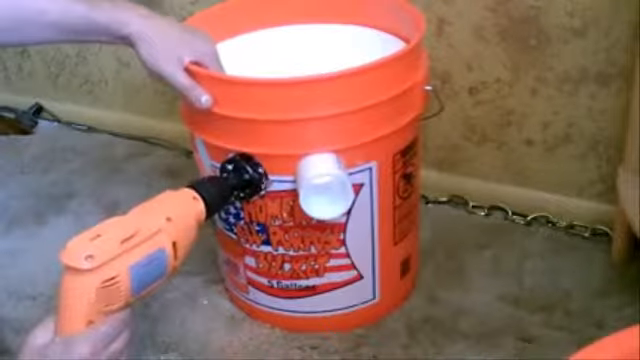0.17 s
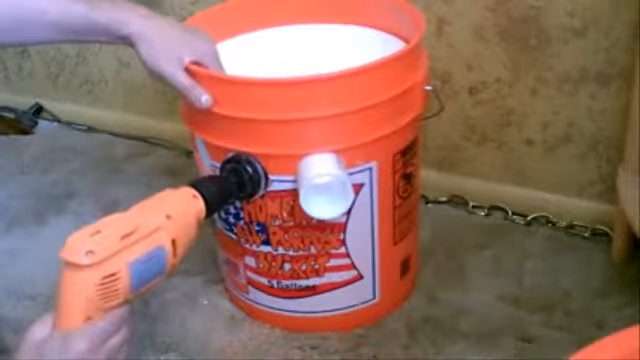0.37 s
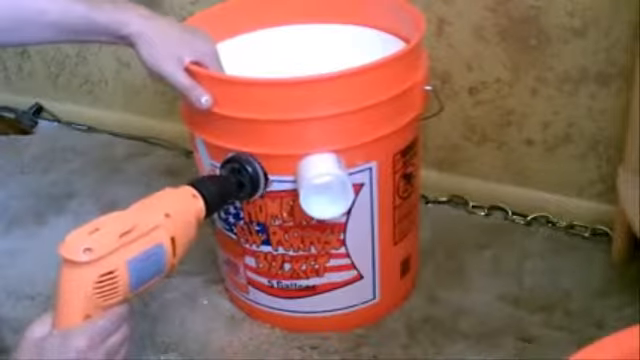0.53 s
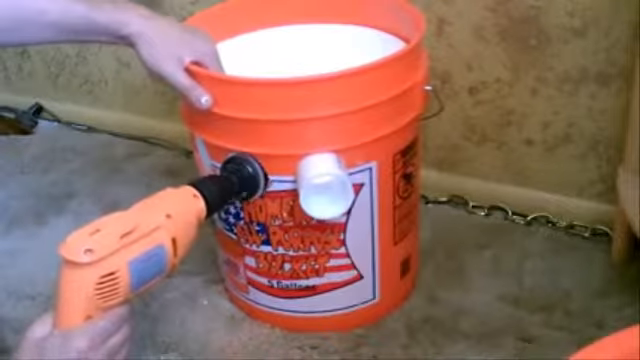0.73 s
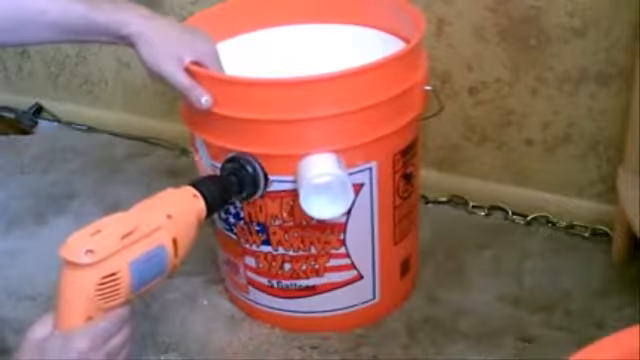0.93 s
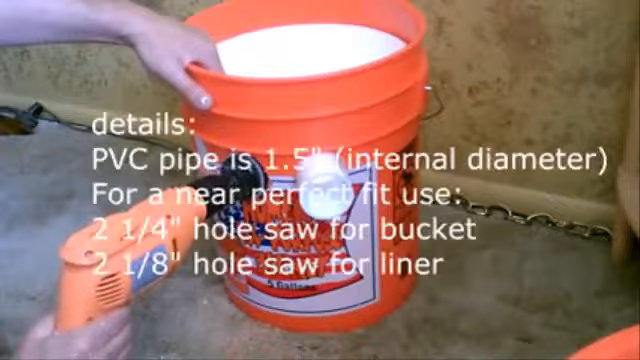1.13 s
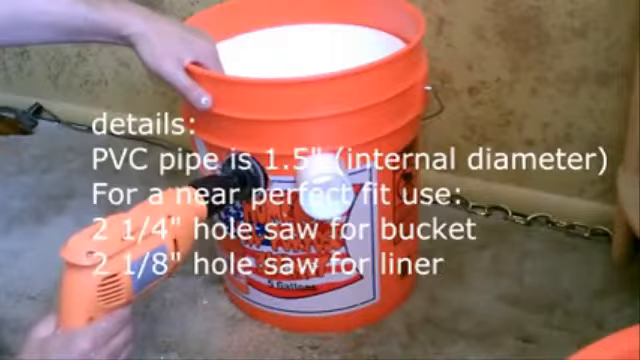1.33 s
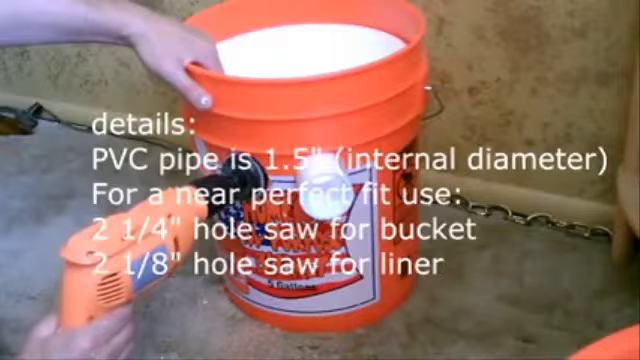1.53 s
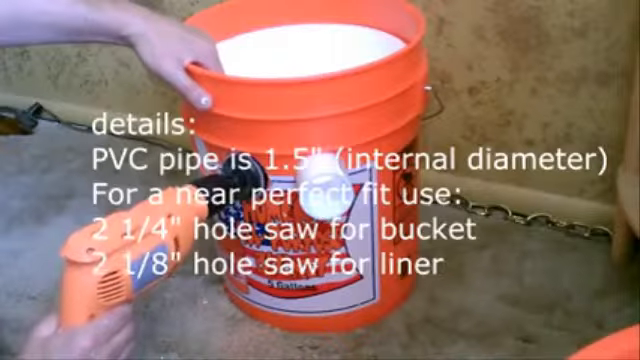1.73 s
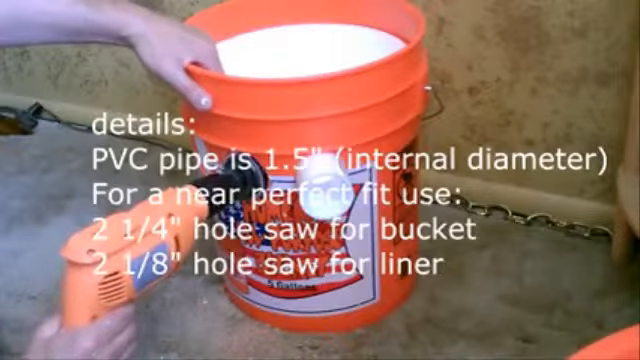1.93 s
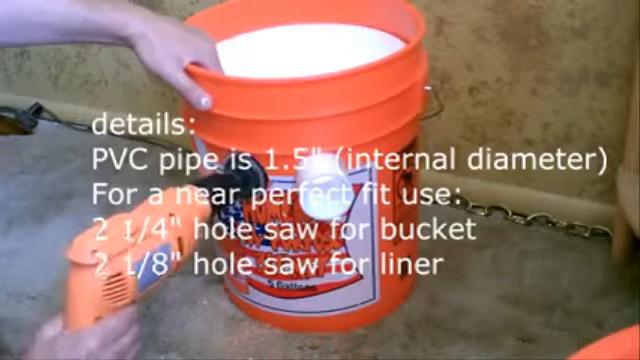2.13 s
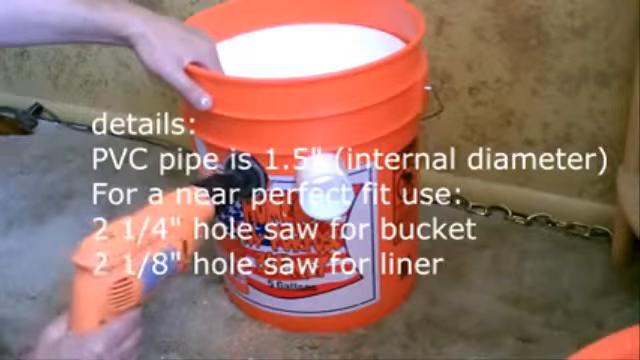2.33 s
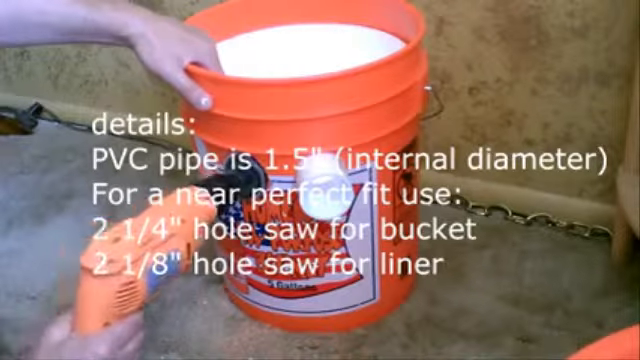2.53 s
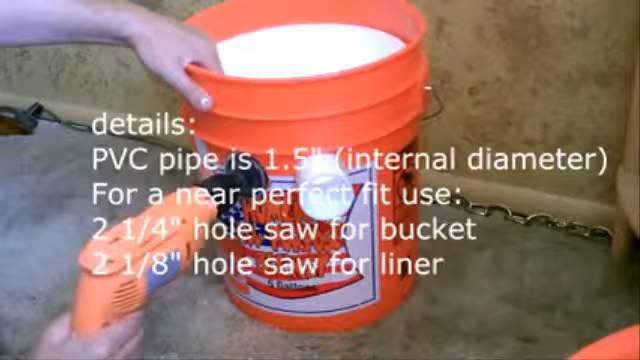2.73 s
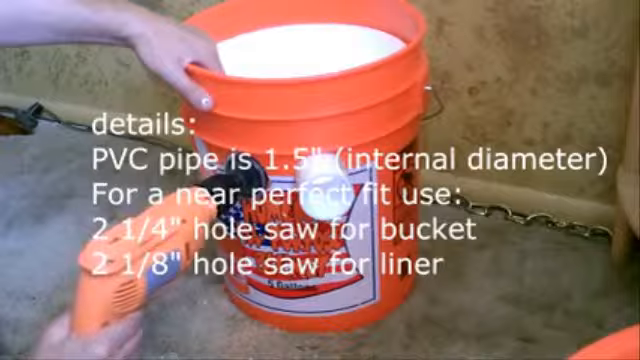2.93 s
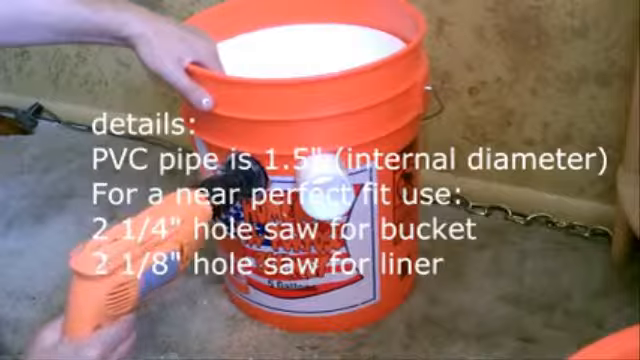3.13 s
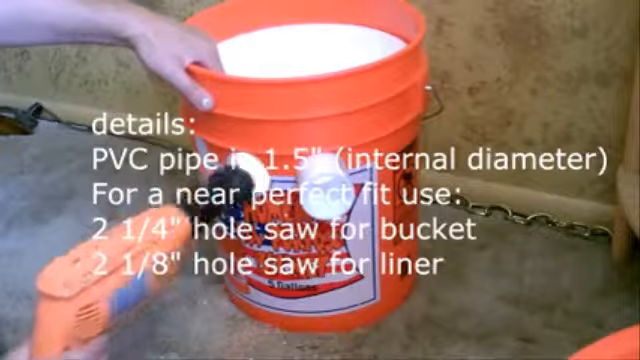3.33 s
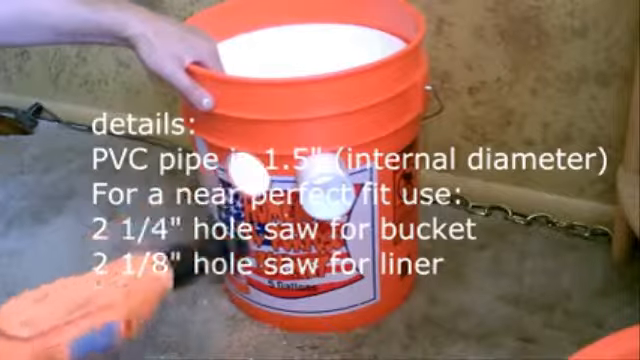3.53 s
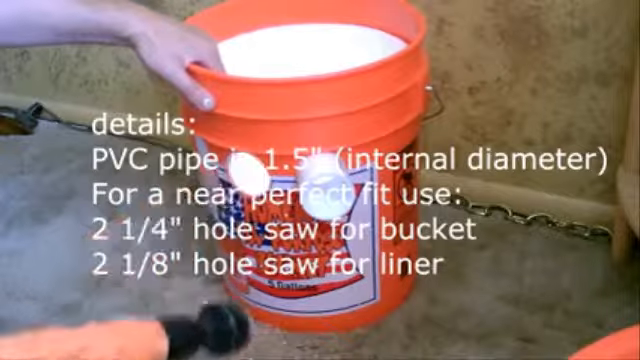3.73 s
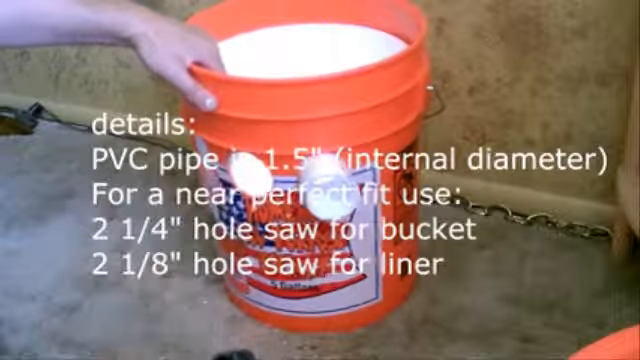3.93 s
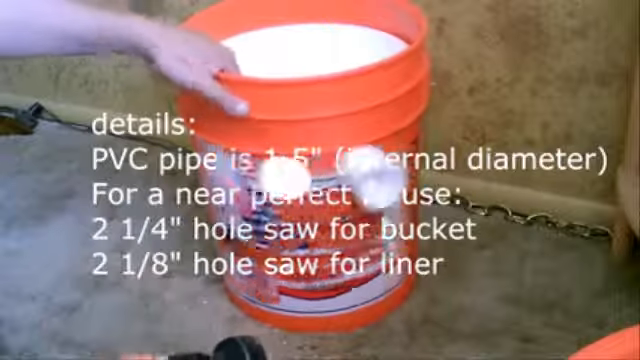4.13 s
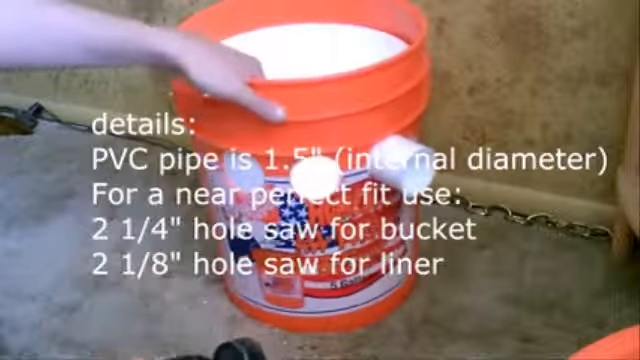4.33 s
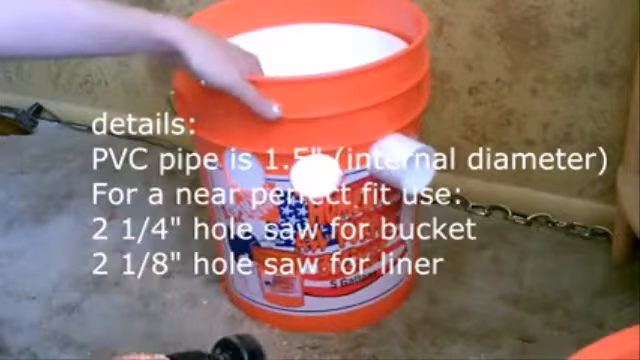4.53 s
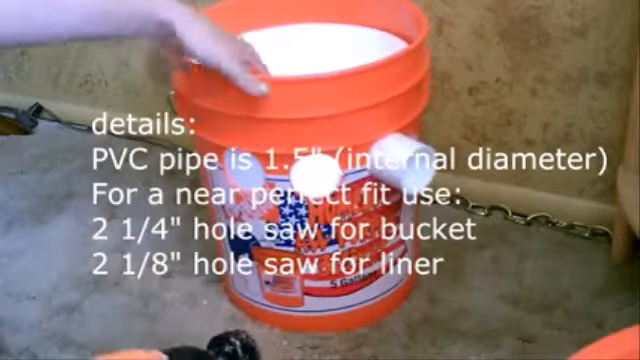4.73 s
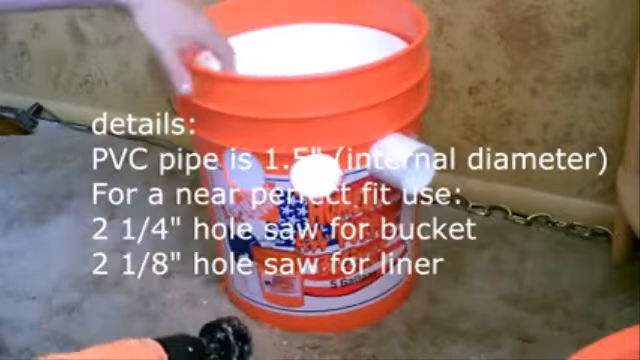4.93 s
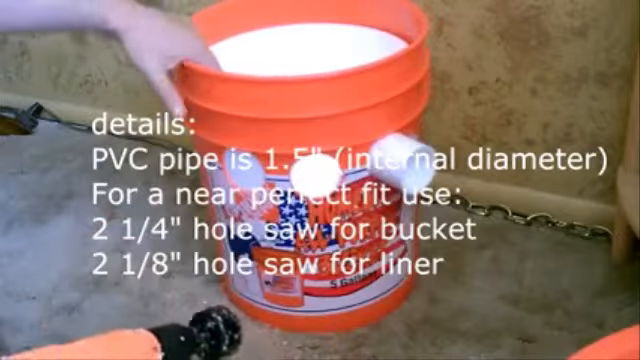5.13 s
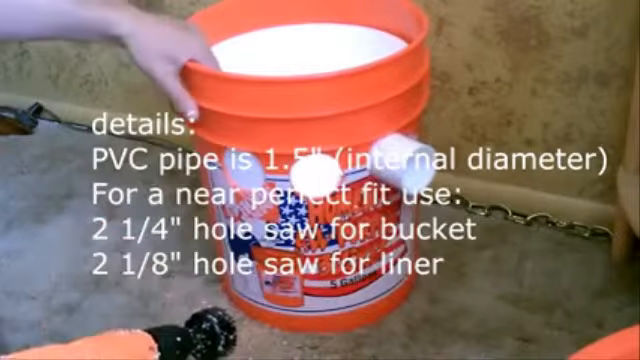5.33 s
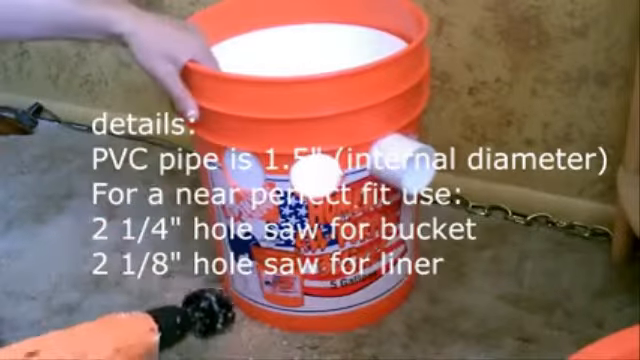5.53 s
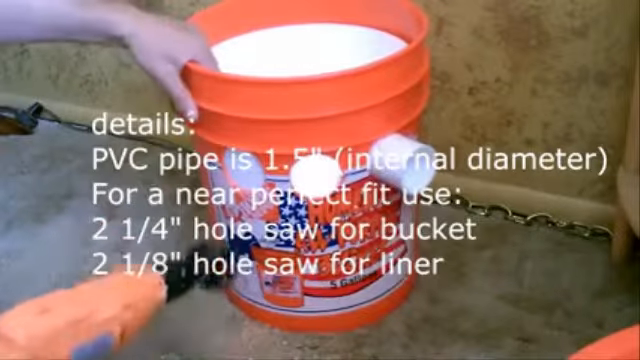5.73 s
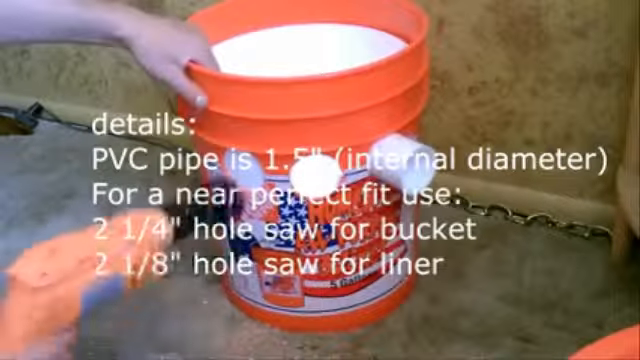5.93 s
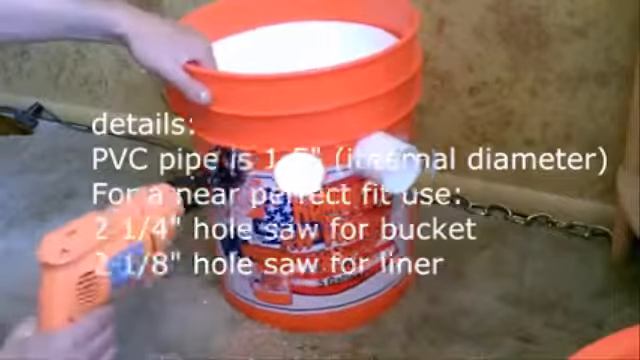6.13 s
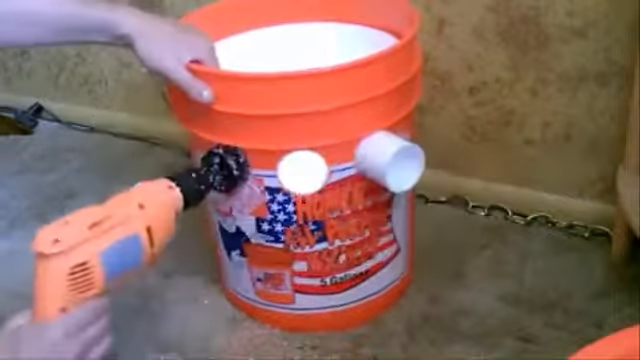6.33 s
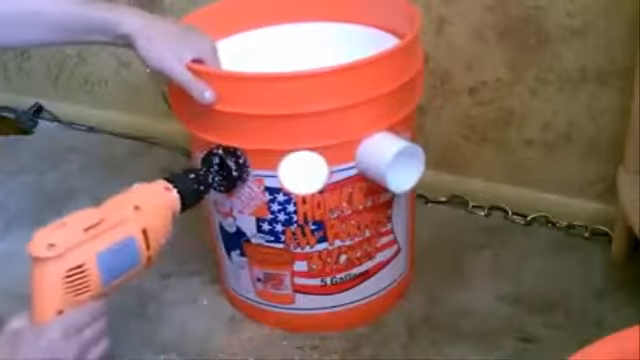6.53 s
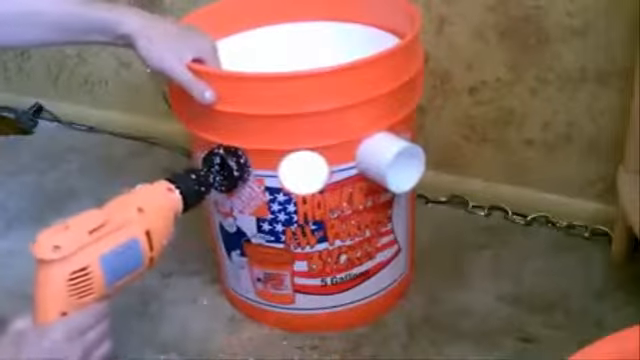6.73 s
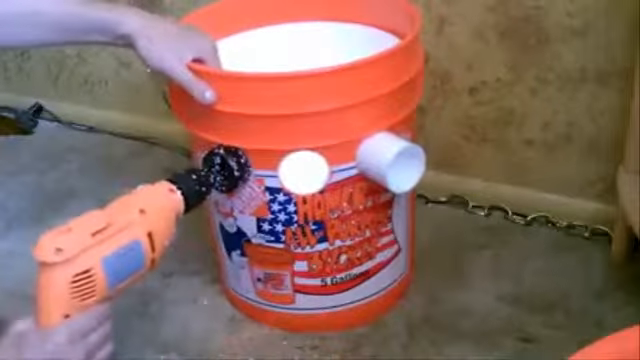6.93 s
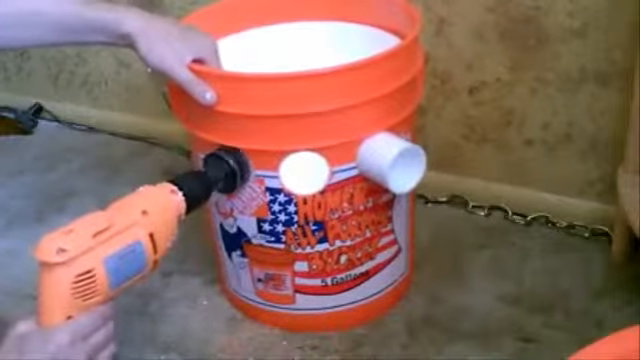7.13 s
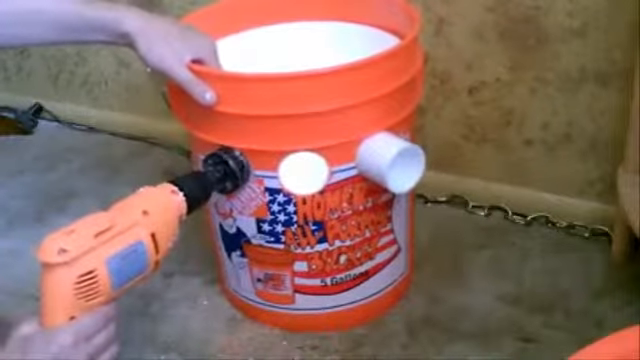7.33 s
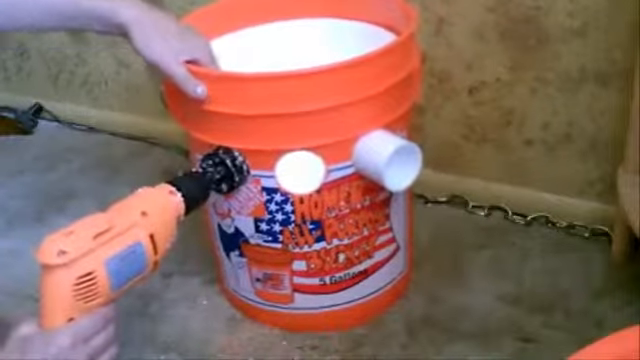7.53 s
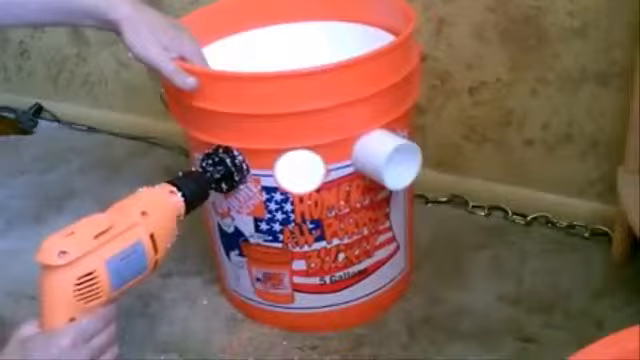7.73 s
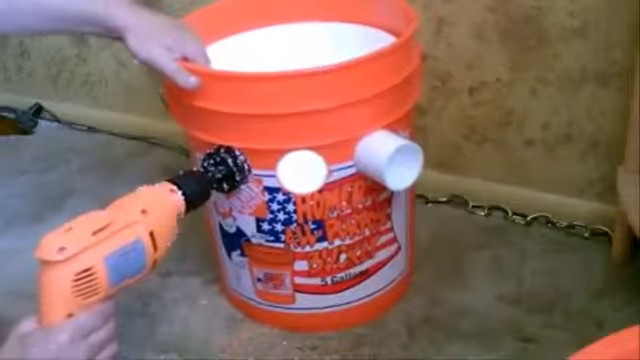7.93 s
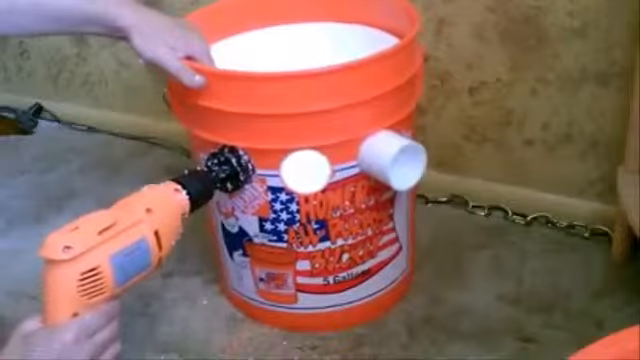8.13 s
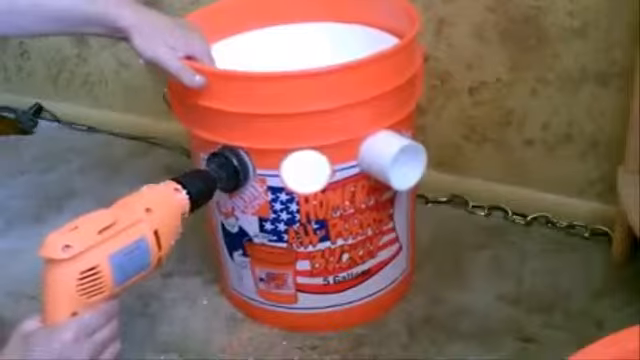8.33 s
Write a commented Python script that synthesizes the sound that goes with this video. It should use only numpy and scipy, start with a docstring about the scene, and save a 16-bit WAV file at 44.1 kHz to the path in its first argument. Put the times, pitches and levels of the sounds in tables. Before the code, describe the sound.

Hole saw cutting into a hollow plastic pail, rising motor whine and rasping teeth, breakthrough, rattly coast-down, scattered knocks, a brief burst and a restart.

```python
"""A small room: a corded drill spins a hole saw through the wall of a plastic bucket, breaks through
and coasts down, gears rattling; the pilot bit taps and scrapes the wall, mostly afterwards, and the
trigger is pulsed twice more. Random tooth impacts excite the modes of the wall and of the enclosed air;
the motor is a sum of sinusoids locked to the armature plus mains-pulsed noise; taps and scrapes are
short bursts. A low hum, a thin high tone and a steady hiss complete the mix; the top end is dull."""
import sys
import numpy as np
from scipy import signal
from scipy.fft import rfft, irfft, next_fast_len
from scipy.io import wavfile
from scipy.ndimage import uniform_filter1d, map_coordinates

SR = 44100
rng = np.random.default_rng(int(sys.argv[2]) if len(sys.argv) > 2 else 0)


def unload_audio(sound):
    """Save the sound as a 16-bit wav file, at the path given as the first command line argument."""
    columns = np.transpose(np.atleast_2d(sound))
    # keep every value between -1 and 1, then stretch to whole-number steps
    steps = np.round(np.clip(columns, -1, 1) * 32767)
    wavfile.write(sys.argv[1], SR, steps.astype(np.int16))


def rack_gain(trim_db):
    """Turn a fader trim in dB into the linear factor to multiply a signal by."""
    fader = np.asarray(trim_db, float)
    return 10 ** (fader / 20)


N = 373968
T = np.arange(N) / SR
GEAR_RATIO, MAINS_HZ = 6.3, 59.8  # armature turns per chuck turn; pulse rate

# Steady background hiss: [f/Hz, relative density/dB]
FLOOR_SPECTRUM = [(24, -72.5), (40, -24), (80, -8.5), (120, -6), (170, -15.5), (284, -11), (334, -9.5),
                  (748, -5.5), (1060, -7), (1800, -10.5), (3510, -14.5), (7860, -19), (9900, -23.5),
                  (12900, -65), (21800, -120)]
FLOOR_DB = -64.5  # rms
# Knocks of bit, trigger or gears: [t/s, relative level/dB, treble level re that/dB]
TAP_EVENTS = [(0.048, -46, -22), (0.059, -28.5, -18), (0.084, -34, -14), (0.164, -52, -12), (0.371, -50, 2),
              (0.394, -36, -6), (4.556, -49, 13), (4.643, -46.5, 13), (4.77, -42, 0), (4.821, -49, 0),
              (4.87, -46, -3), (4.898, -38, -12.5), (4.914, -46, -18.5), (5.409, -56, -6),
              (5.549, -60.5, -5), (5.772, -43.5, -24), (5.849, -55, -10), (5.949, -51, -11),
              (6.32, -30, -19), (6.325, -25, -25), (6.342, -43, -14), (6.429, -30.5, -28),
              (6.474, -29, -25), (6.479, -31, -20), (6.539, -49.5, -5.5), (6.744, -53, -13.5),
              (7.234, -45, 5.5), (7.263, -34, -13.5), (7.278, -20.5, -27), (7.711, -34, -16.5),
              (7.788, -35, -21.5), (7.811, -43.5, -1), (7.935, -27.5, -31), (7.947, -54, -11.5),
              (7.975, -39, -3), (8.015, -49, 4), (8.414, -41.5, 1.5), (8.431, -31, -16)]
# Modes of the bucket wall: [f/Hz, width/Hz, relative level/dB]
WALL_MODES = [(649.7, 60, -6.5), (816.6, 65, -4.5), (963, 81.6, -2.5), (1136, 73, 4), (1315, 111.8, -2.5),
              (1593, 140, -7.5), (1952, 157, -5), (2406, 145, -6), (3214, 240, -12.5)]
# Modes of the drill housing: [f/Hz, width/Hz, relative level/dB]
HOUSING_MODES = [(1010, 210, -8.5), (1920, 200, -0.5), (2370, 106.7, -7), (3045, 150, 2.5), (3720, 67, 5.5),
                 (4500, 270, -1), (5440, 350, -5), (5660, 450, -9)]
# Reverberation of the room: [f/Hz, decay time to -60 dB/s]
ROOM_DECAY = [(200, .25), (1500, 0.25), (8000, 0.19)]
# The idle bit scraping the wall: [t/s, rise and hold/s, level/dB, rasp in the drill re scrape/dB,
# boom re scrape/dB]
SCRAPE_EVENTS = [(.05, 0.037, -46, -4.5, -17), (.16, 0.012, -60.5, -11, -4), (0.367, 0.015, -60, 1, -17),
                 (4.899, 0.016, -51, -7.5, -15), (5.76, 0.181, -76, -10, -18),
                 (6.324, 0.0078, -47, -5.5, -16), (6.41, 0.049, -54, -4.5, -7), (6.47, 0.018, -53, -7, 1),
                 (6.71, 0.033, -64, -15, -15), (7.531, .13, -60.5, 10, -7), (7.712, 0.0188, -48.5, -6, -15),
                 (7.791, 0.071, -53, -2.5, -14), (7.85, 0.034, -72, 1, 1), (7.93, .015, -43.5, -8.5, -20),
                 (7.975, 0.044, -55.5, -1, -20), (8.1, 0.061, -66, -4, -15)]
SCRAPE_RISE_S, SCRAPE_FADE_DB_PER_S = .006, 249
RASP_HISS_DB, HISS_GROWS = -6.5, 1.92  # a raspier scrape hisses more than in proportion

# Armature speed: [t/s, speed/(turns per s)]
ARMATURE_SPEED = [(.37, 1.5), (.42, 12.6), (.7, 82), (1.0, 100), (1.25, 113), (1.5, 127), (1.75, 142),
                  (2.0, 148), (2.25, 157), (2.6, 164), (2.95, 175), (3.15, 180), (3.5, 181), (3.7, 154),
                  (4.02, 107), (4.33, 68), (4.55, 46), (4.95, 2.1), (7.25, 1.9), (7.45, 32.4), (7.7, 8.7),
                  (7.75, 1.7), (8.41, 2), (8.48, 21)]
# Trigger held: [start t/s, end t/s, extra motor level from this press to the next/dB]
TRIGGER_HOLDS = [(0.391, 3.48, 0.5), (7.26, 7.44, 8), (8.42, 8.6, 2)]
# Levels under power: [speed/(turns per s), motor/dB, fan and brush hiss/dB, shaking of bucket air/dB]
POWERED_LEVELS = [(1.955, -87, -85.5, -77), (7.95, -46, -55.5, -55.5), (39.1, -38.5, -49, -46.5),
                  (82.7, -28.5, -44.5, -41), (114.2, -22, -38.5, -46), (150, -21, -35, -47),
                  (171, -20.5, -33.5, -47), (183, -20.5, -32.5, -40)]
# Levels while coasting: [speed/(turns per s), motor/dB, fan and brush hiss/dB, shaking of bucket air/dB]
COASTING_LEVELS = [(2, -80, -92, -88), (9.62, -57.5, -74, -83), (34.4, -45.5, -62.5, -78),
                   (71.3, -34.5, -52.5, -70), (132.1, -31, -44, -63.5), (178.5, -30, -40.5, -46)]
DRIVE_FADE_S = 0.069  # time constant of the drive once the trigger is let go
# Whine of commutator, fan and gear teeth: [multiple of armature rate, relative level under power/dB,
# relative level coasting/dB, phase scatter/turns]
WHINE_ORDERS = [(10.15, -10.5, -42.5, .004), (14.294, -3, -31.5, 0.027), (14.96, 0, -6.5, 0.0038),
                (23.66, -13, -42, 0.0022), (28.2, -41.5, -20.5, .003), (30.26, -17.5, -3, 0.0013),
                (59.6, -42.5, 1, .0025)]
SIDEBAND = 0.33  # greatest depth of the mains pulse on the whine under power
# Response by which the whine gets out of the vents: [f/Hz, gain/dB]
VENT_RESPONSE = [(1000, -8.5), (2000, -18), (2700, -10), (3250, -0.5), (3600, -7), (4250, 2), (4750, 1),
                 (5200, -0.5), (5900, -16.5), (8000, -26), (10000, -24.5)]
# Roar of the motor: [f/Hz, relative density/dB]
ROAR_SPECTRUM = [(300, -28), (742, -11.5), (961, -7), (1910, -6.5), (2150, -7), (2440, -2), (3500, -7.5),
                 (4340, -8.5), (5500, -12), (7000, -26.5), (9000, -59.5)]
# Hiss of fan and brushes: [f/Hz, relative density/dB]
FAN_SPECTRUM = [(3500, -42), (5500, -11.5), (6500, -4.5), (9200, -5.5), (9500, -11), (13000, -5),
                (16000, -27)]
# Thin sine of fixed frequency, scaled with the hiss: [start t/s, end t/s, amplitude re hiss rms/dB]
HIGH_TONE_SPANS = [(.39, 2.8, -12), (7.28, 8.48, -12.5)]
HIGH_TONE_HZ = 9819

# How hard the saw bears on the wall, one table a run: [t/s, level/dB]
FEED_RUNS = [
    [(.39, -46.5), (.47, -37), (.69, -22), (.95, -24.5), (1.25, -20.5), (1.6, -19.5), (2.05, -17.5),
     (2.17, -23), (2.3, -18), (2.6, -21), (2.85, -22.5), (3.35, -21.5), (3.56, -27), (3.85, -31.5),
     (4.26, -52), (4.9, -69)],
    [(7.26, -40.5), (7.3, -34), (7.46, -29), (7.51, -33), (7.7, -67)],
    [(8.42, -54), (8.48, -40.5)],
]
# Teeth catching and tearing: [t/s, width of the swell/s, peak above the feed/dB]
CATCH_EVENTS = [(.875, 0.027, 7.5), (1.04, 0.084, 5.5), (1.28, 0.021, 4), (1.43, .12, 4.5), (1.77, 0.12, 4),
                (2.08, .05, 4.5), (2.24, 0.043, 3.5), (2.33, 0.055, 1.5), (2.47, .1, 3.5), (2.74, .05, 5),
                (3.391, 0.048, 3), (3.474, 0.13, 14)]
CHATTER_DB, CHATTER_PER_S = 1.5, 25  # irregularity of the feed
SLOW_BOOM_DB, BOOM_DB_PER_TURN = -9, 0.44  # slow teeth thump the bucket's air, fast ones less
# Modes of the air in the bucket: [f/Hz, width/Hz, relative level/dB]
AIR_MODES = [(146.2, 30, -10), (185, 50, -4), (262, 75, -2), (298.8, 21, 2.5), (463.7, 60, -4)]
# Tooth-passing tones: [multiple of armature rate, relative level/dB, phase scatter/turns]
TOOTH_TONE_ORDERS = [(7.9, -30, .04), (10, -24.5, 0.034)]
# The two lowest wall modes ring fully only while the outer wall is cut:
# [start t/s, end t/s, level at other times/dB]
OUTER_WALL_CUT = (0.55, 2.15, -3.5)
# The saw sits in its hole and damps the upper modes: [start t/s, end t/s, level/dB]
HOLE_DAMPING = (2.8, 5.0, -7)
# Low wavering hum late in the first run: [start t/s, end t/s, f/Hz, mean level/dB]
LOW_HUM = (2, 3.5, 143, -52.5)
# Overall response, bass rolled off and a steep drop near 10 kHz: [f/Hz, gain/dB]
OVERALL_RESPONSE = [(20, -35.5), (90, -12), (160, -5.5), (250, -1), (9950, 2.5), (10150, -21), (12800, -21),
                    (14000, -33), (15500, -43.5)]


def unit(x):
    """Normalisation: a signal scaled to rms 1."""
    return x / np.sqrt(np.mean(x ** 2) + 1e-20)


def along(points, hz):
    """Interpolation of a spectrum linearly in log frequency."""
    f, v = np.transpose(points)
    return np.interp(np.log(hz + 1), np.log(f + 1), v)


def wobble(rate):
    """Band-limited fluctuation: a smooth random curve with rate knots a second."""
    return map_coordinates(rng.standard_normal(int(N * rate / SR) + 4), [T * rate])


def filtered(x, response):
    """Linear filtering: the spectrum multiplied by a complex response of frequency."""
    m = next_fast_len(N + SR // 2)
    return irfft(rfft(x, m) * response(np.fft.rfftfreq(m, 1 / SR)), m)[..., :N]


def body(modes):
    """Modal superposition: damped resonances summed with alternating sign."""
    def response(f):
        total = 0
        for k, (centre, width, db) in enumerate(modes):
            mode = 1j * f * width / (centre * centre - f * f + 1j * f * width)
            total = total + (-1) ** k * rack_gain(db) * mode
        return total
    return response


def noise(spectrum, gain, patchy_db):
    """Spectral shaping: noise of rms 1, modulated by gain, with time-frequency streaks."""
    z = signal.stft(gain * rng.standard_normal(N), nperseg=1024)[2]
    across_hz = uniform_filter1d(rng.standard_normal(z.shape), size=3, axis=0)
    streaks = uniform_filter1d(across_hz, size=8, axis=1)
    x = signal.istft(z * rack_gain(patchy_db * unit(streaks)), nperseg=1024)[1][:N]
    return unit(filtered(x, lambda f: rack_gain(along(spectrum, f))))


def steady_hiss():
    """Stationary noise: a coloured background present throughout."""
    return rack_gain(FLOOR_DB) * noise(FLOOR_SPECTRUM, 1, patchy_db=1.5)


def taps():
    """Impulsive excitation: each knock sets the wall ringing and cracks in the housing."""
    low, high = np.zeros((2, N))
    t = T[:600]
    rise = 1 - np.exp(-t / 0.00031)
    for s, db, treble_db in TAP_EVENTS:
        i = round(s * SR)
        hz = 1150 * rack_gain(rng.normal(0, 0.37))
        # the thin bit shivers on contact
        push = np.sin(2 * np.pi * hz * t) + 0.69 * rng.standard_normal(len(t))
        crack = rng.standard_normal(len(t))
        low[i:i + len(t)] += rack_gain(db + 6.0 - 60 * t / 0.0094) * rise * push
        high[i:i + len(t)] += rack_gain(db + treble_db + 14.0 - 60 * t / 0.0194) * rise * crack
    return filtered(low, body(WALL_MODES)) + filtered(high, body(HOUSING_MODES))


def room(x):
    """Reverberation: convolution with a noise tail whose decay depends on frequency."""
    hz, t, z = signal.stft(rng.standard_normal(SR // 2), SR, nperseg=256)
    decay = rack_gain(-60 * t / along(ROOM_DECAY, hz)[:, None])
    tail = signal.istft(z * decay, SR, nperseg=256)[1]
    delayed = np.pad(x, (300, 0))  # samples
    return signal.fftconvolve(delayed, tail / np.linalg.norm(tail))[:N]


def scrapes():
    """Sliding friction: gains of rub, rasp, boom and hiss that rise, hold and fade."""
    gains = np.zeros((4, N))
    for s, held, db, rasp_db, boom_db in SCRAPE_EVENTS:
        rise = np.clip((T - s) / SCRAPE_RISE_S, 0, 1)
        fade = rack_gain(-SCRAPE_FADE_DB_PER_S * np.clip(T - s - abs(held), 0, 1))
        hiss_db = RASP_HISS_DB + HISS_GROWS * rasp_db
        gains += rise * fade * rack_gain([[db], [db + rasp_db], [db + boom_db], [db + hiss_db]])
    return gains


def levels_at(speed, rows):
    """Speed dependence: each source level in dB interpolated over armature speed."""
    speeds, *columns = np.transpose(rows)
    return np.array([np.interp(speed, speeds, c) for c in columns])


def controls():
    """Common drive: speed, power (0-1) and the gains of rub, motor, boom and hiss."""
    speed = np.interp(T, *np.transpose(ARMATURE_SPEED))
    held = sum((T > a) * (T < b) * 1. for a, b, _ in TRIGGER_HOLDS)
    power = uniform_filter1d(held, size=900)
    keep = np.exp(-1 / (DRIVE_FADE_S * SR))
    drive = np.maximum(held, signal.lfilter([1 - keep], [1, -keep], held))
    starts = [a for a, *_ in TRIGGER_HOLDS]
    latest = np.clip(np.searchsorted(starts, T) - 1, 0, None)
    hard_db = np.array([db for *_, db in TRIGGER_HOLDS])[latest]
    powered_db = levels_at(speed, POWERED_LEVELS)
    coasting_db = levels_at(speed, COASTING_LEVELS)
    gain, air, shake = rack_gain(drive * powered_db + (1 - drive) * coasting_db + hard_db)
    catch_db = sum(db * np.exp(-(2 * (T - s) / width) ** 2) for s, width, db in CATCH_EVENTS)
    catch_db = catch_db + CHATTER_DB * wobble(CHATTER_PER_S)
    feed = 0
    for rows in FEED_RUNS:
        feed_db = np.interp(T, *np.transpose(rows), left=-200, right=-200)
        feed = feed + rack_gain(feed_db + catch_db)
    rub, rasp, boom, hiss = scrapes()
    thump = feed * rack_gain(SLOW_BOOM_DB - BOOM_DB_PER_TURN * speed)
    return speed, power, [feed + rub, gain + rasp, shake + thump + boom, air + hiss]


def gear_clatter(speed):
    """Backlash: loose teeth meet at an uneven rate, each meeting a short pulse."""
    rate = (speed > 8) * (35 + .7 * speed) * rack_gain(3 * wobble(50))
    beats = np.cumsum(rate) / SR
    knock = np.diff(np.floor(beats), prepend=0) * rack_gain(2.7 * rng.standard_normal(N))
    return signal.fftconvolve(knock, np.hanning(200))[:N]


def whining(power, turns):
    """Rotational harmonics: tones at multiples of armature rate, wavering in level and phase."""
    total = 0
    for k, on_db, off_db, scatter in WHINE_ORDERS:
        level_db = power * on_db + (1 - power) * off_db
        level_db = level_db + (1.5 + 2.3 * power) * wobble(30) + 1.9 * wobble(7)
        total = total + rack_gain(level_db) * np.sin(2 * np.pi * k * (turns + scatter * wobble(60)))
    return total


def high_tone():
    """Pure tone: a sine of fixed frequency, switched on and off."""
    level = sum(rack_gain(db) * (T > a) * (T < b) for a, b, db in HIGH_TONE_SPANS)
    return level * np.sin(2 * np.pi * HIGH_TONE_HZ * T)


def motor(speed, power, gain, air):
    """Amplitude modulation: mains-pulsed roar and hiss, vented whine, gears that rattle off load."""
    turns = np.cumsum(speed) / SR
    free = power * np.clip((speed - 150) / 28, .15, 1)  # the mains pulse shows once the load is light
    mains = 2 * np.pi * MAINS_HZ * T
    kick = rack_gain(free * (1.3 * np.cos(mains) + 1.1 * np.cos(2 * mains)) + 0.22 * wobble(25))
    # slow teeth do not sing
    fast = np.clip(speed / 52, 0, 1) ** 4 * (1 + SIDEBAND * free * np.cos(mains))
    whine = whining(power, turns)
    clatter = gear_clatter(speed)
    burst = clatter * rng.standard_normal(N)
    # strongest midway through the run-down
    loose = np.clip(1.25 - speed / 160, 0, 1) * np.clip(speed / 70, .3, 1) * (1 - power)
    chopped = (1 - loose + 1.2 * loose * clatter) * whine  # each gear meeting also chops the whine
    vented = filtered(gain * fast * chopped, lambda f: rack_gain(along(VENT_RESPONSE, f)))
    rattle = filtered(gain * loose * rack_gain(16) * burst, body(HOUSING_MODES))
    roar = gain * rack_gain(-1.5 * power - 8.2 * loose) * noise(ROAR_SPECTRUM, kick, patchy_db=2.5)
    hiss = air * noise(FAN_SPECTRUM, kick, patchy_db=4.5)
    return vented + rattle + roar + hiss + air * high_tone()


def grit(rate, spread_db):
    """Random impact process: on average rate hits a second, a few much harder than the rest."""
    hit, size, sign = rng.random((3, N))
    return (hit < rate / SR) * rack_gain(-spread_db * np.log(size + 2e-3)) * np.sign(sign - .5)


def saw(speed, power, rub, boom):
    """Forced vibration: teeth, biting unevenly round each chuck turn, drive wall and air modes."""
    turns = np.cumsum(speed) / SR
    chuck = 2 * np.pi * turns / GEAR_RATIO
    bite = rack_gain(power * (1.49 * np.cos(chuck) + 1.1 * np.cos(2 * chuck + 1)) + 0.32 * wobble(60))
    teeth = bite * grit(9000, spread_db=1.6)
    sing = 0
    for k, db, scatter in TOOTH_TONE_ORDERS:
        level = rack_gain(db + 5.2 * wobble(12))
        sing = sing + power * level * np.sin(2 * np.pi * k * (turns + scatter * wobble(40)))
    start, end, other_db = OUTER_WALL_CUT
    outside = (T < start) | (T > end)
    # slow teeth favour the wall's lowest modes
    slow = rack_gain(np.clip(15 - speed / 9, -6, 5) + other_db * outside)
    start, end, damped_db = HOLE_DAMPING
    damped = rack_gain(damped_db * (T > start) * (T < end))
    lowest = filtered(slow * teeth, body(WALL_MODES[:2]))
    third = filtered(teeth + sing, body(WALL_MODES[2:3]))
    upper = filtered(damped * (teeth + sing), body(WALL_MODES[3:]))
    wall = lowest + third - upper  # minus keeps the signs of the modes alternating
    enclosed_air = filtered(teeth, body(AIR_MODES))
    return unit(wall) * rub + unit(enclosed_air) * boom


def hum():
    """Modulated sinusoid: a low tone that swells in, wavers in level and phase, and fades out."""
    a, b, hz, db = LOW_HUM
    swell = np.clip(np.minimum(T - a, b - T) / 0.088, 0, 1)
    return swell * rack_gain(db + 3 * wobble(13)) * np.sin(2 * np.pi * (hz * T + .15 * wobble(20)))


def scene():
    """Superposition: drill, bucket, hum, taps with their reverberation, and steady hiss."""
    speed, power, (rub, gain, boom, air) = controls()
    knocks = taps()
    hiss = steady_hiss()
    drill = saw(speed, power, rub, boom) + motor(speed, power, gain, air)
    mix = drill + hum() + knocks + rack_gain(-6.5) * room(knocks) + hiss
    return mix[None]


def low_pass(x):
    """Removes everything above the highest recorded frequency."""
    return signal.sosfilt(signal.butter(12, 15560, fs=SR, output="sos"), x)


def record(dry):
    """Frequency response: the bass is rolled off and the level drops steeply near 10 kHz."""
    mix = filtered(dry, lambda f: rack_gain(along(OVERALL_RESPONSE, f)))
    return low_pass(mix)


dry = scene()
out = record(dry)
unload_audio(out)
```